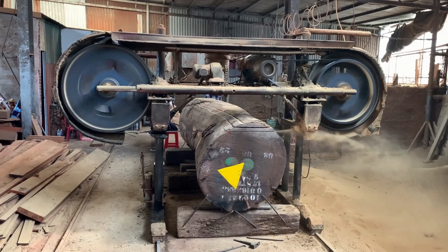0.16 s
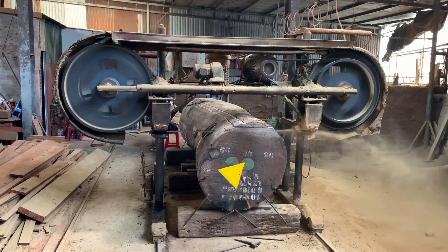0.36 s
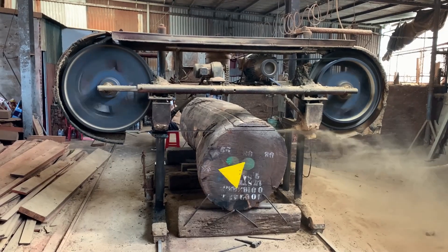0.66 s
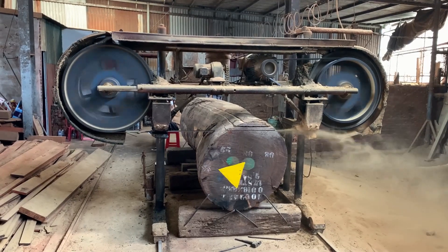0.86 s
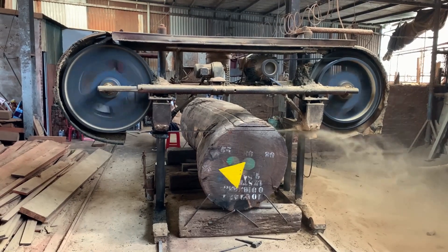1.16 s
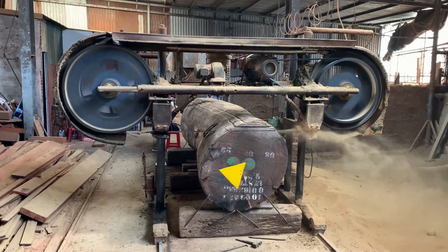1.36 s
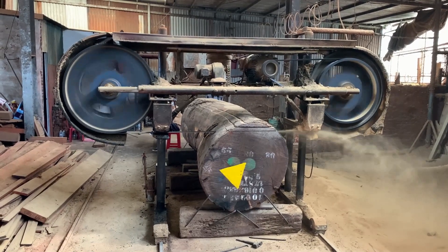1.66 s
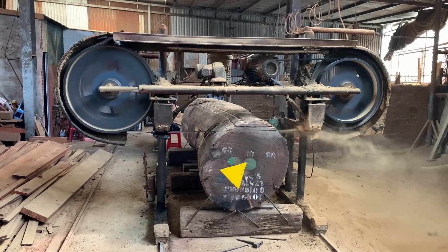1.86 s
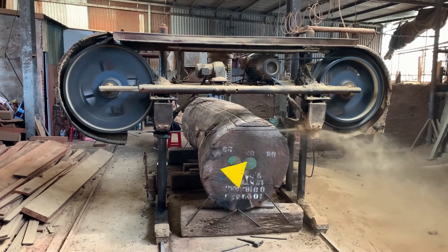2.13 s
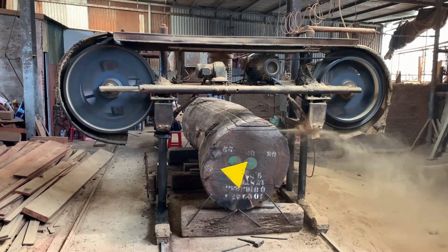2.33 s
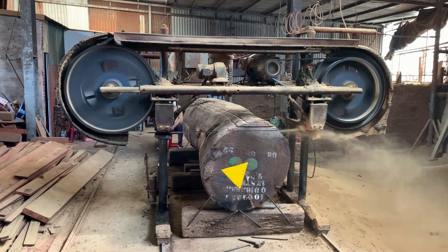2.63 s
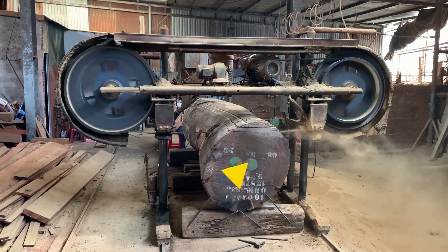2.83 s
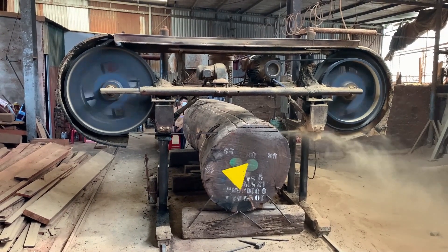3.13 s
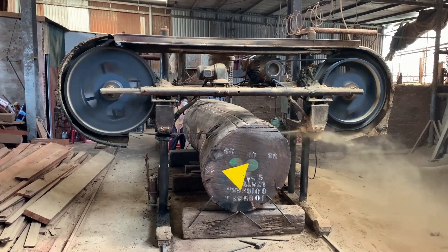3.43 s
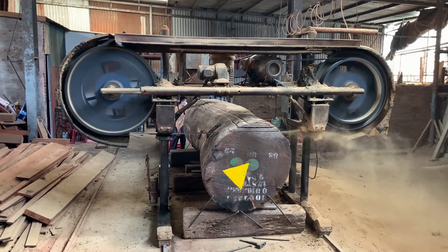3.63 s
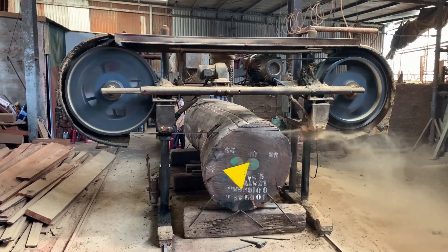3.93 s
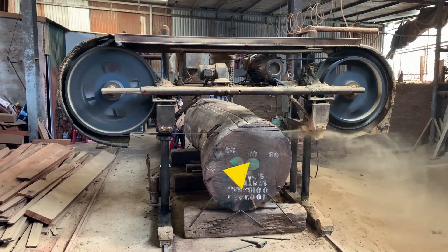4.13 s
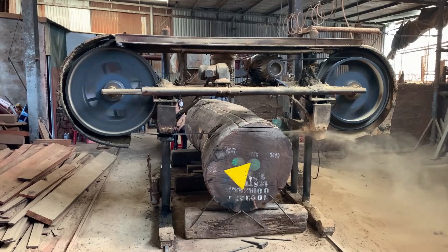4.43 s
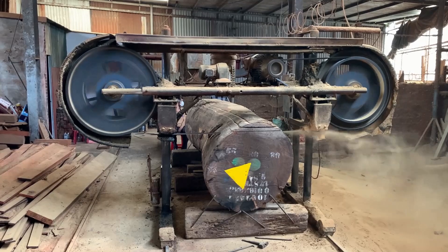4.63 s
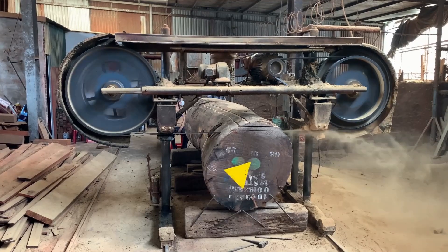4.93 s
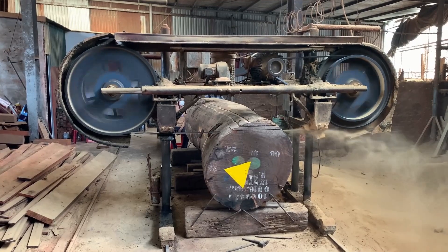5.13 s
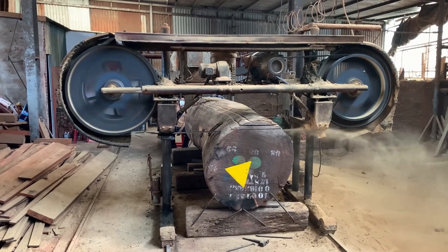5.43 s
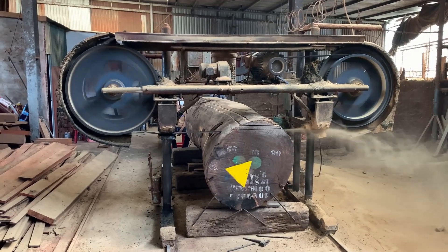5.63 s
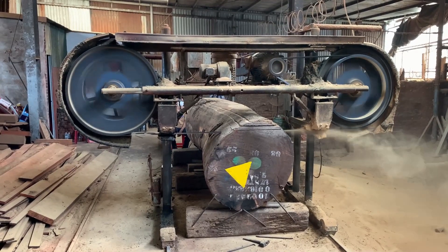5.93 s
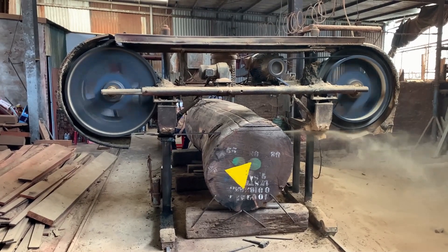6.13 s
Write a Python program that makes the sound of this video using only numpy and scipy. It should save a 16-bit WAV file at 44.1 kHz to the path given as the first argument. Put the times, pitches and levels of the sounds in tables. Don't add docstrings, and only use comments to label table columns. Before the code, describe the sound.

In an open shed a large band sawmill cuts a thick log without pause. A bright, dense rasping hiss dominates, gritty and slightly fluttering. Beneath it the blade hums and rings at a mid pitch, pulsing about four times a second, while motor and wheels roar. Squeal flares more in the second half. Close, wide stereo, dry, no start or stop.

```python
import sys
import numpy as np
from scipy import signal
from scipy.fft import rfft, irfft, next_fast_len
from scipy.io import wavfile
from scipy.ndimage import uniform_filter1d, map_coordinates

SR = 44100
rng = np.random.default_rng(int(sys.argv[2]) if len(sys.argv) > 2 else 0)


def to_wav(s):
    ch = np.atleast_2d(s).T
    pcm = np.round(np.clip(ch, -1, 1) * 32767)
    wavfile.write(sys.argv[1], SR, pcm.astype(np.int16))


def rack_gain(trim_db):
    fader = np.asarray(trim_db, float)
    return 10 ** (fader / 20)


N = 276948

LAP_HZ, DRIVE_HZ, TOOTH_HZ = 3.958, 43.953, 500.2
TOP_HZ = 15740

# (frequency [Hz], density [dB per Hz])
FRAME_SPECTRUM = [(20, -24.5), (60, -17.5), (130, -12), (250, -7.5), (420, -7.5), (520, -4), (780, -6.5),
                  (880, 2), (1050, 0.5), (1400, -8), (2000, -12.5), (3000, -42)]
# (time [s], half width [s], level [dB])
DRIVE_STRAIN = [
    (1.2, 0.45, 2.5),
    (2.75, 0.92, 1.5),
    (3.92, .06, -1),
]
# (multiple [1], level [dB rms])
TOOTH_LINES = [(3, -61.5), (6, -56.5), (9, -55.5), (5, -69)]
# (frequency [Hz], width [Hz], level [dB])
HUM_MODES = [(356.3, 49, -0.11), (322.6, 60, -0.89)]
# (frequency [Hz], width [Hz], level [dB])
RING_MODES = [(692.7, 82, 0.67), (651.7, 31.4, -1.9)]
# (frequency [Hz], width [Hz], level [dB])
SQUEAL_MODES = [(4505, 34, 5), (4435, 135, 3), (4650, 110, -3), (3880, 160, -6), (8080, 170, -1.5),
                (9640, 200, -2.5), (13720, 260, -6)]
# (frequency [Hz], width [Hz], level [dB])
GUIDE_MODES = [(2508, 55, 0), (2340, 100, -5.5)]
# (frequency [Hz], density [dB per Hz])
HISS_SPECTRUM = [(760, -32), (1300, -9), (1850, -9), (2430, -3), (2750, -7), (3650, -7), (4180, -8),
                 (4490, -4), (5250, -10.5), (6610, -5), (7570, -6), (8310, -0.5), (13400, -7), (15700, -9)]
# (blur [Hz], level [dB])
TOOTH_OVERTONES = [(55, 6), (45.8, 3.5), (50, 5), (70, 6.5), (110, 6.5), (100, -6), (120, 6.5), (100, 7),
                   (130, 4), (130, 2.5), (150, 5), (100, 4.5), (180, 1), (150, 5.5), (180, -17), (229, 3),
                   (210, 7.5), (150, -7), (160, -1), (180, 4), (450, -5.5), (160, 0), (230, 8.5), (200, -3),
                   (300, 3), (160, -5), (200, -8), (200, -7)]
# (time [s], share sunk [0-1])
CUT_DEPTH = [
    (0, 0),
    (1, 0.23),
    (2, 0.35),
    (2.9, 0.33),
    (3.6, 0.7),
    (4.4, 0.53),
    (5.2, 1),
    (6.28, 1),
]
# (place [laps], half width [laps], hum [dB], ring [dB], load [dB])
LOOP_SPOTS = [
    (.03, 0.065, 0, -0.5, -1.5),
    (.13, 0.063, -4, -2, -.5),
    (.41, .06, -4, -1, 0.5),
    (.57, 0.043, 1, -2.5, 1.6),
    (.72, 0.047, -1.5, -2.5, -.7),
    (.86, 0.1, -6.5, -2, 0.5),
]
# (time [s],
# half width [s], level [dB])
KNOTS_IN_WOOD = [(.02, .06, 0.5), (.62, .05, 0.5), (1.77, 0.028, -1), (2.02, 0.028, -1.5), (2.14, .04, 2),
                 (2.28, 0.023, 0), (2.48, 0.032, 2.5), (3.03, .03, -0.5), (4.19, 0.019, 1),
                 (4.55, .03, -0.5), (5.45, .05, -0.5), (5.7, .03, 1), (6.15, 0.2, -1)]
# (time [s], half width [s], level [dB])
HUM_SLACK = [
    (1.78, 0.045, -4),
    (3, 0.036, -11),
    (3.76, 0.065, -9),
    (4.27, 0.043, -12),
    (4.55, 0.058, -4),
    (6.28, 0.029, -10),
]
# (time [s], half width [s], level [dB])
RING_DAMPED = [
    (.4, 0.07, -0.5),
    (1.77, .03, -6),
    (2.03, .02, -11),
    (2.75, 0.17, -2.5),
    (4.94, .025, -3.5),
]
# (time [s], half width [s], level [dB])
SQUEAL_FLARES = [
    (2.48, .04, 6),
    (3.2, 0.17, 3.5),
    (4.45, 0.067, 4),
    (4.97, .03, 1),
    (5.3, 0.045, 4.5),
    (5.9, .12, 2),
    (6.08, .05, -4),
]
# (time [s], half width [s], level [dB])
GUIDE_RUBS = [
    (.25, 0.11, 6),
    (1.05, 0.17, 4),
    (2.85, 0.18, 5),
    (3, .03, 1),
    (4.6, 0.22, 5),
]
# (frequency [Hz], left minus right [dB])
MICROPHONE_SIDES = [(60, -6), (250, -3), (345, -8), (480, 2), (690, -6), (900, -2), (2400, -1),
                    (4500, -0.8), (5500, -3), (7500, -3), (8500, -5.5), (10000, -4.5), (12000, -1),
                    (15000, 0)]


def unit(x):
    return x / np.sqrt(np.mean(x ** 2) + 1e-20)


def spectrum(points, hz):
    f, db = np.transpose(points)
    return rack_gain(np.interp(np.log(hz + 1), np.log(f + 1), db))


def humps(modes, hz, droop=1):
    power = 0
    for centre, width, db in modes:
        side_width = np.where(hz < centre, droop * width, width)
        power = power + rack_gain(db) ** 2 / (1 + (2 * (hz - centre) / side_width) ** 2) ** 2
    return power


def filtered(x, response):
    m = next_fast_len(N + SR // 2)
    return irfft(rfft(x, m) * response(np.fft.rfftfreq(m, 1 / SR)), m)[..., :N]


def rush(response, patchy_db):
    z = signal.stft(rng.standard_normal((2, N)), nperseg=512)[2]
    field = rng.standard_normal(z.shape[1:])
    field = uniform_filter1d(field, size=6, axis=0)
    field = uniform_filter1d(field, size=10, axis=1)
    pair = signal.istft(z * rack_gain(patchy_db * unit(field)), nperseg=512)[1][:, :N]
    return unit(filtered(pair, response))


def resonant_rush(modes, patchy_db):
    return rush(lambda hz: np.sqrt(humps(modes, hz)), patchy_db)


def wobble(rate):
    knots = rng.standard_normal(int(N * rate / SR) + 4)
    return map_coordinates(knots, [np.arange(N) * rate / SR])


def swells(at, centre, width, db, lap=False):
    total = 0
    for c, w, d in zip(centre, width, db):
        gap = (at - c + .5) % 1 - .5 if lap else at - c
        total = total + d * np.exp(-(gap / w) ** 2)
    return total


def events(rows):
    return swells(np.arange(N) / SR, *np.transpose(rows))


def sunk(start, added):
    seconds, share = np.transpose(CUT_DEPTH)
    return start + added * np.interp(np.arange(N) / SR, seconds, share)


def laps():
    place, width, *columns = np.transpose(LOOP_SPOTS)
    turns = np.arange(N) / SR * LAP_HZ
    patterns = [swells(turns, place, width, column, lap=True) for column in columns]
    return [pattern - pattern.mean() for pattern in patterns]


def machine():
    split = 260 ** 2
    roar = rush(lambda hz: spectrum(FRAME_SPECTRUM, hz) * hz ** 2 / (hz ** 2 + split), patchy_db=1.5)
    rumble = rush(lambda hz: spectrum(FRAME_SPECTRUM, hz) * split / (hz ** 2 + split), patchy_db=0.75)
    roar_db = -43 + events(DRIVE_STRAIN) + 5.0 + 0.15 * wobble(12)
    return rack_gain(roar_db) * roar + rack_gain(-50.0) * rumble


def whine():
    turn = 2 * np.pi * TOOTH_HZ * np.arange(N) / SR

    def line(multiple, db):
        level_db = db + 2.0 + 5.3 * wobble(2.8)
        phase = multiple * (turn + 0.61 * wobble(3.3)) + rng.uniform(0, 2 * np.pi)
        return rack_gain(level_db) * np.sin(phase)

    return np.array([sum(line(k, db) for k, db in TOOTH_LINES) for _ in "LR"])


def blade():
    hum_lap, ring_lap, load_lap = laps()

    hum_db = sunk(-46.5, added=-3) + events(HUM_SLACK) + 2.5 + sunk(1.4, added=1.2) * hum_lap
    hum = rack_gain(hum_db) * resonant_rush(HUM_MODES, patchy_db=.4)

    ring_db = sunk(-40.5, added=1.5) + 1.2 * events(KNOTS_IN_WOOD) + events(RING_DAMPED)
    ring_db = ring_db + 2.0 + ring_lap + .6 * wobble(20)
    drive_throb = 1 + .36 * np.cos(2 * np.pi * DRIVE_HZ * np.arange(N) / SR - 1.15)
    ring = rack_gain(ring_db) * drive_throb * resonant_rush(RING_MODES, patchy_db=0.14)

    squeal_db = sunk(-45, added=4.5) + events(SQUEAL_FLARES) + 4.5 + 2 * load_lap + 0.42 * wobble(25)
    squeal = rack_gain(squeal_db) * resonant_rush(SQUEAL_MODES, patchy_db=1.5)

    sing_db = sunk(-45.5, added=-2.5) + events(GUIDE_RUBS) + 2.0 + 1.1 * wobble(20)
    sing = rack_gain(sing_db) * resonant_rush(GUIDE_MODES, patchy_db=.8)
    return hum + ring + squeal + sing


def cut():
    overtones = [(k * TOOTH_HZ - blur / 6, blur, db) for k, (blur, db) in enumerate(TOOTH_OVERTONES, start=4)]

    def tooth_response(hz):
        return spectrum(HISS_SPECTRUM, hz) * np.sqrt(humps(overtones, hz, droop=1.1))

    tearing = rush(lambda hz: spectrum(HISS_SPECTRUM, hz), patchy_db=1.09)
    biting = rush(tooth_response, patchy_db=1.6)
    hiss = unit(tearing + rack_gain(-4.5) * biting)

    fill = filtered(hiss, lambda hz: np.sqrt(humps([(6440, 1900, 0)], hz)))
    hiss = hiss + (rack_gain(sunk(-3, added=3.5)) - 1) * fill

    chatter = filtered(rng.standard_normal(N), lambda hz: np.sqrt(humps([(110, 68, 0)], hz)))
    load_db = .8 * laps()[2] + .3 * wobble(14) + .75 * unit(chatter)
    level_db = sunk(-29.5, added=-0.37) + events(KNOTS_IN_WOOD) + 3.5
    return rack_gain(level_db + load_db + .5 * wobble(35) + 0.61 * wobble(300)) * hiss


def scene():
    return machine() + whine() + blade() + cut()


def roll_off(x):
    return signal.sosfilt(signal.butter(12, 16080, fs=SR, output="sos"), x)


def record(dry):
    def microphones(hz):
        contrast = spectrum(MICROPHONE_SIDES, hz)
        return np.array([contrast ** .5, contrast ** -.5]) * (hz < TOP_HZ)

    def colour(hz):
        return spectrum(MICROPHONE_SIDES, hz) * [[.5], [-.5]] * (hz < TOP_HZ)

    mix = filtered(dry, microphones)
    return roll_off(mix)


dry = scene()
out = record(dry)
to_wav(out)
```